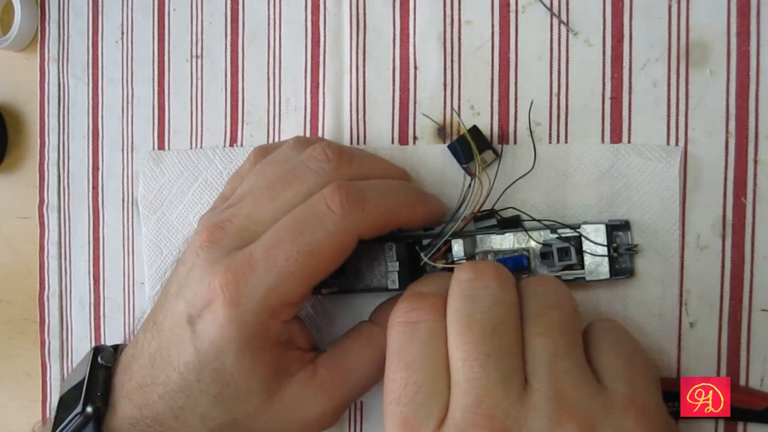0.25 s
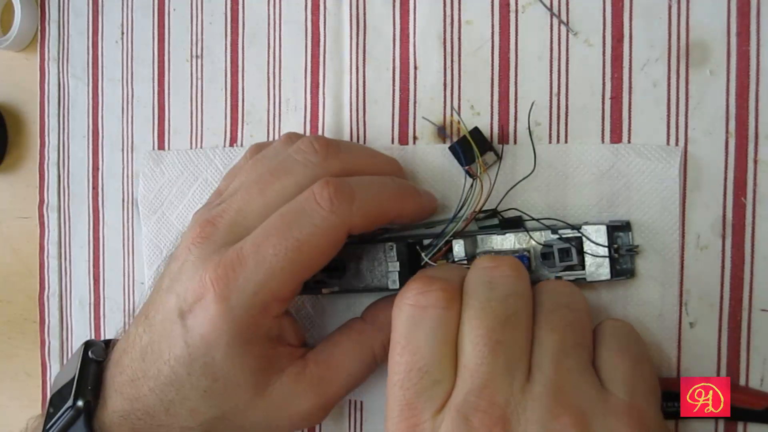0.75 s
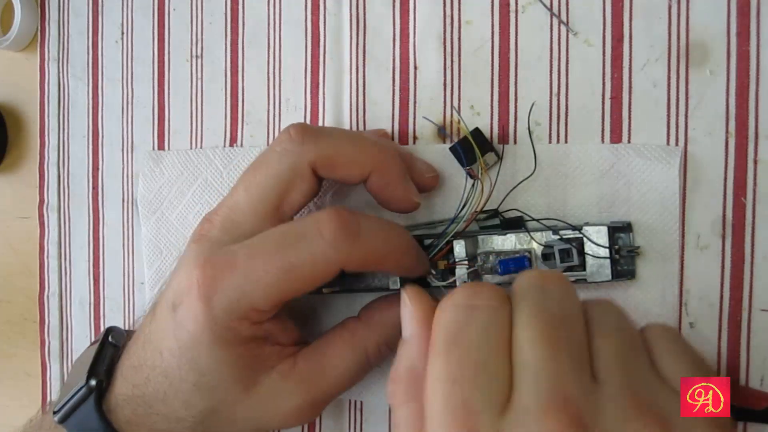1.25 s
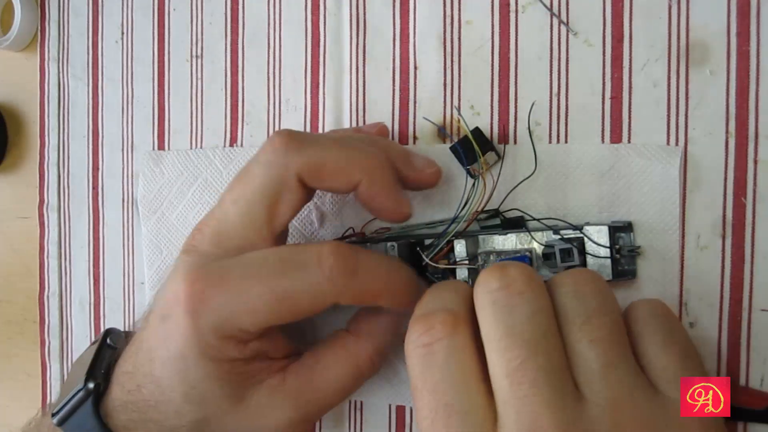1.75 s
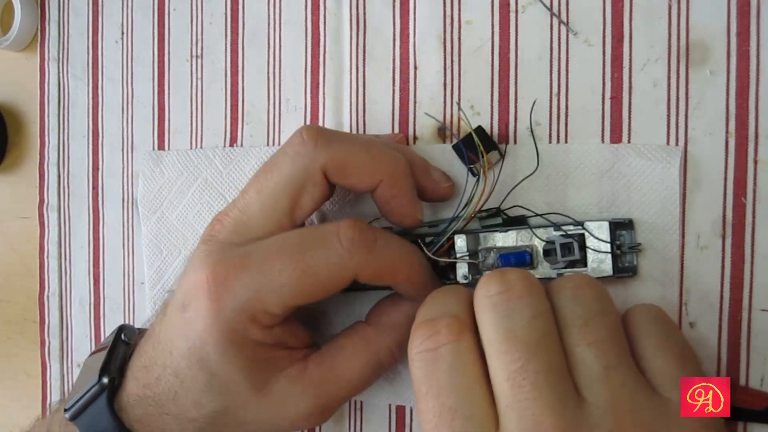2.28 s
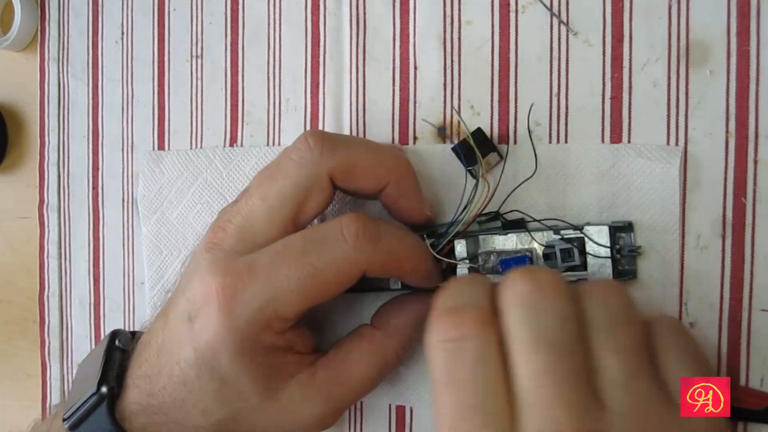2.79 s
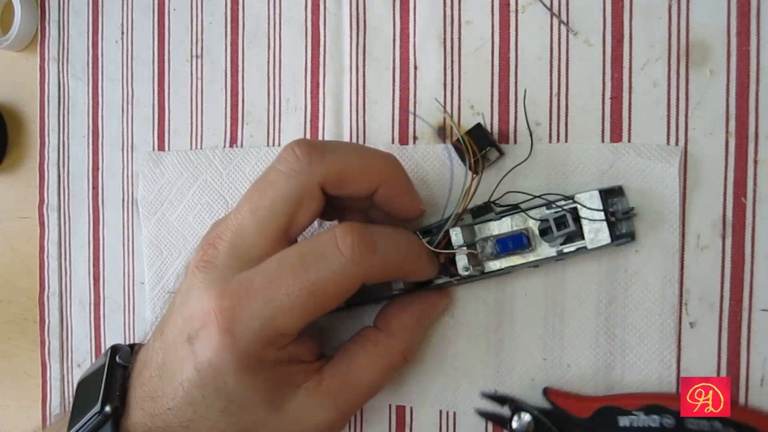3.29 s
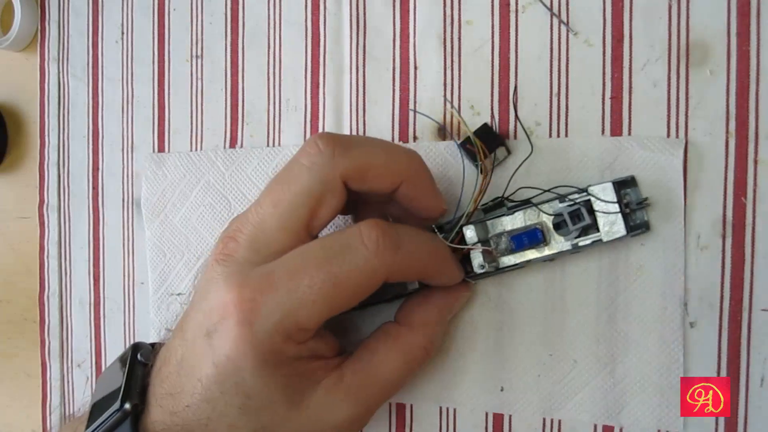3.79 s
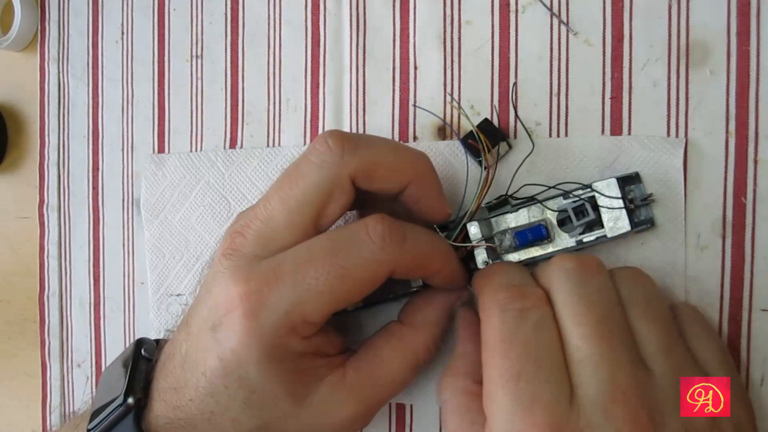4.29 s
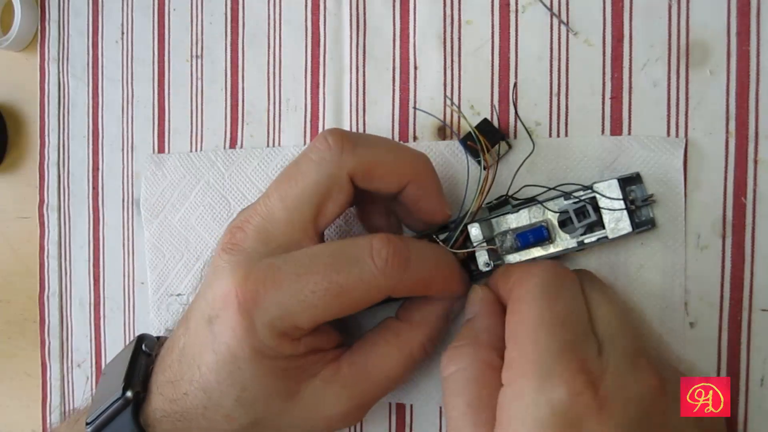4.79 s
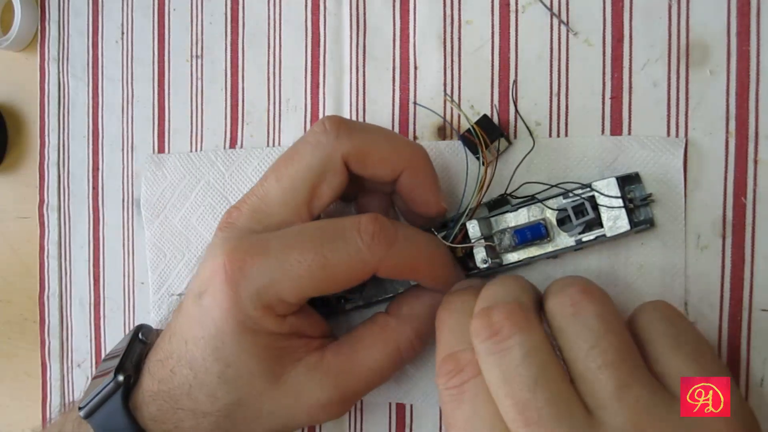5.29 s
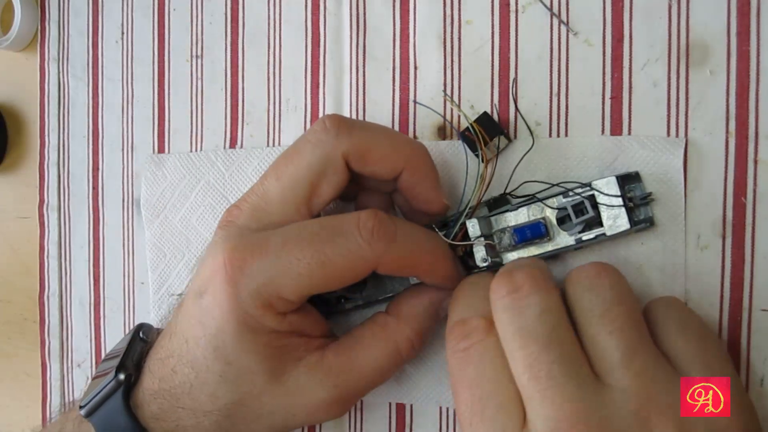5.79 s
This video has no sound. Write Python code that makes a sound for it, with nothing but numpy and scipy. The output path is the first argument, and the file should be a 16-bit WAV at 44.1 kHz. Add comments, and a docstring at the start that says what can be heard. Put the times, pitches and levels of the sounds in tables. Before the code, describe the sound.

A faint, steady high whine and soft hiss fill a small room, with a distant clock barely ticking once a second. Near the microphone, small plastic and metal parts rub and click quietly as they are handled. Then a hand tool lands on a wooden workbench, rocking in a quick run of knocks that is by far the loudest sound. Sparse, soft clicks come afterwards.

```python
"""From the start an appliance whines faintly over room hiss, and a distant clock steps once a second.
Close by, fingers work on a small plastic and metal assembly: parts scrape and click by stick-slip.
Near 3.7 s a hand tool is put down on the cloth-covered wooden bench. It rocks and clatters, and each
impact excites the modes of the bench top, which booms into the small room.
A few more clicks and a light scrape follow."""
import sys
import numpy as np
from scipy import signal
from scipy.fft import rfft, irfft, next_fast_len
from scipy.io import wavfile
from scipy.ndimage import uniform_filter1d

SR = 44100
rng = np.random.default_rng(int(sys.argv[2]) if len(sys.argv) > 2 else 0)


def master(y):
    """Save y as 16-bit WAV."""
    cut = np.clip(np.atleast_2d(y).T, -1, 1)
    pcm = np.round(cut * 32767)  # scale
    wavfile.write(sys.argv[1], SR, pcm.astype(np.int16))


N = 266805
T = np.arange(int(.7 * SR)) / SR  # time axis of one short event, t/s


def undb(db):
    """Amplitude ratio of a level in decibels."""
    return 10 ** (np.asarray(db) / 20)


def level(x, db):
    """Set the rms of a steady sound."""
    return x * undb(db) / np.sqrt(np.mean(x ** 2))


def burst(x, db):
    """Set the energy of a transient, as its level if packed into 10 ms."""
    return x * undb(db) / np.sqrt(np.sum(x ** 2) / (SR / 100))


def add(out, s, x):
    """Superposition: mix x in at time s."""
    i = max(int(s * SR), 0)
    out[i:i + len(x)] += x[:N - i]


def colour(x, points):
    """Minimum-phase filtering through (f/Hz, level/dB) points keeps attacks clean."""
    hz, db = np.transpose(points)
    size = next_fast_len(len(x))
    f = np.maximum(np.fft.rfftfreq(size, 1 / SR), 1)
    gain = undb(np.interp(np.log(f), np.log(hz), db))
    cepstrum = irfft(np.log(gain), size)
    cepstrum[1:size // 2] *= 2
    cepstrum[size // 2:] = 0
    return irfft(rfft(x, size) * np.exp(rfft(cepstrum)), size)[:len(x)]


def resonate(x, hz, width):
    """A single resonance with unit gain at its centre."""
    return signal.lfilter(*signal.iirpeak(hz, hz / width, fs=SR), x)


def lowpass(x, hz):
    """Second-order roll-off of the treble."""
    return signal.sosfilt(signal.butter(2, min(hz, SR / 2 - 1), fs=SR, output="sos"), x)


def highpass(x, hz):
    """Fifth-order roll-off of the bass."""
    return signal.sosfilt(signal.butter(5, hz, "high", fs=SR, output="sos"), x + 1e-18)


def fade(t60):
    """Exponential decay, 60 dB down after t60."""
    return np.exp(-np.log(1000) * np.minimum(T / t60, 10))


def swell(length):
    """A raised-cosine rise and fall."""
    return np.sin(np.pi * np.minimum(T / length, 1)) ** 2


def noise(points, envelope):
    """A short burst of filtered noise."""
    return colour(rng.standard_normal(len(T)) * envelope, points)


def ring(modes):
    """Free vibration: one damped sinusoid a row, for each mode."""
    return np.array([undb(db) * np.sin(2 * np.pi * hz * T) * fade(t60) for hz, db, t60 in modes])


def wander(rate_hz):
    """Smooth random modulation with unit rms."""
    hold = int(SR / rate_hz)
    steps = np.repeat(rng.standard_normal(N // hold + 1), hold)
    return level(uniform_filter1d(uniform_filter1d(steps, hold), hold)[:N], 0)


def room(x, wet_db, low_t60=0.47, high_t60=0.61, split_hz=2500, build_s=0.004):
    """Reverberation: a small room's diffuse field builds quickly and decays in two bands."""
    reflections = rng.standard_normal(len(T))
    low = lowpass(reflections, split_hz) * fade(low_t60)
    high = highpass(reflections, split_hz) * fade(high_t60)
    tail = (low + high) * (1 - np.exp(-(T / build_s) ** 2))
    return x + undb(wet_db) * signal.fftconvolve(x, tail / np.sqrt(np.sum(tail ** 2)))[:N]


def hiss(db=-50.5):
    """The room's noise floor: stationary broadband noise, weaker towards the treble."""
    # spectral density: f/Hz, relative level/dB
    spectrum = [(20, -1), (50, 2), (100, 2), (160, 0.5), (200, 2), (300, -0.5), (700, -1.5), (1100, -2),
                (1550, -6), (2300, -5), (3200, -9.5), (5500, -11.5), (8200, -15.5), (9800, -15),
                (12000, -21), (16000, -26)]
    return level(colour(rng.standard_normal(N), spectrum), db)


def whine(drift=0.00031, flutter_db=0.2):
    """Motor tones beat with their sidebands, drift and flutter over resonances excited by rushing air."""
    # main tones: f/Hz, rms level/dB, sideband spacing/Hz
    main_tones = [(2181, -57.3, 30.6), (2467.3, -57.8, 29.2)]
    # from two spacings below a main tone to one above it: relative level/dB
    sidebands = [-9.5, -2.8, 0, -11]
    # faint hum: f/Hz, rms level/dB
    hum = [(399, -71)]
    # faint upper partials: f/Hz, rms level/dB
    partials = [(4495, -77), (4597, -74), (4646, -74), (4990, -78), (5545, -76), (5572, -76), (5932, -78),
                (6691, -80), (7564, -81), (10191, -83)]
    # air resonances: f/Hz, nominal bandwidth/Hz, rms level/dB
    air_bands = [(2215, 300, -56.6), (2482, 150, -58.8)]
    motor_time = np.cumsum(1 + drift * wander(rate_hz=1.995)) / SR
    clusters = [(hz + k * spacing, db + side_db)
                for hz, db, spacing in main_tones for k, side_db in enumerate(sidebands, -2)]
    tones = sum(level(np.sin(2 * np.pi * (hz * motor_time + rng.random())), db)
                for hz, db in hum + clusters + partials)
    air = np.zeros(N)
    for hz, width, db in air_bands:
        broad = resonate(rng.standard_normal(N), hz, 2 * width)
        air += level(resonate(broad, hz, 2 * width), db)
    return tones * undb(flutter_db * wander(rate_hz=4.08)) + air


def clock(first_s=.39, period_s=1, db=-50.5, step_s=0.061, rebound_s=0.047, rebound_db=-5):
    """The movement steps and falls back, exciting the case's resonances; distance blurs each tick."""
    # case resonances: f/Hz, bandwidth/Hz, relative level/dB
    case_modes = [(1182, 76, 5), (2960, 470, -7.5)]
    out = np.zeros(N)
    for s in np.arange(first_s, N / SR, period_s):
        for delay, drop_db in ((0, 0), (rebound_s, rebound_db)):
            gears = rng.standard_normal(len(T))
            case = sum(undb(gain_db) * resonate(gears, hz, width) for hz, width, gain_db in case_modes)
            add(out, s + delay - step_s / 2, level(case, db + drop_db) * swell(step_s))
    return out


def ring_and_rustle(hz, crossover_hz=3230, steepness=10, least_share=0.11):
    """Energy partition: gains of ring and contact noise; larger, lower-pitched parts ring more."""
    share = np.clip(1 / (1 + (hz / crossover_hz) ** steepness), least_share, 1)
    return np.sqrt(share), np.sqrt(1 - share)


def rubs(grain_db=3.5, loss_factor=0.058):
    """Sliding friction is a dense run of tiny catches, heard directly and through one resonance."""
    # fingers and parts sliding: middle t/s, duration/s, level/dB, resonance f/Hz
    slides = [(0.025, .12, -42, 2485), (.148, 0.16, -49.5, 3000), (.824, 0.055, -52, 5500),
              (1.101, .048, -49.5, 4500), (1.537, 0.082, -47, 6400), (1.832, .045, -49.5, 6640),
              (2.1, .087, -48, 4730), (2.247, .11, -51, 2450), (2.42, .22, -51.5, 2740),
              (2.98, .13, -49.5, 3600), (3.226, 0.099, -45, 5170), (3.382, .08, -50.5, 3080),
              (4.63, .13, -54, 6100)]
    # spectrum of the rubbing surfaces: f/Hz, relative level/dB
    friction_spectrum = [(150, -4), (1200, 2), (2600, 1.5), (4500, 6), (6800, 2), (8400, -9), (10000, -4),
                         (12500, -16), (16000, -21)]
    out = np.zeros(N)
    for s, length, db, hz in slides:
        # catches vary in size, but none grows into a snap
        sizes = undb(grain_db * np.minimum(rng.exponential(size=len(T)), 4))
        catches = rng.standard_normal(len(T)) * sizes
        ringing, rustling = ring_and_rustle(hz)
        rustle = rustling * level(colour(catches, friction_spectrum), db)
        body = ringing * level(resonate(catches, hz, hz * loss_factor), db)
        slide = (rustle + body) * swell(length)
        start = s - length / 2
        add(out, start, slide[max(int(-start * SR), 0):])
    return out


def clicks(slip_s=.0016, ring_cycles=45):
    """Stick-slip: a catch lets go and a small part rings; at constant Q, high notes die soonest."""
    # parts snapping into place: t/s, level/dB, ring f/Hz
    snaps = [(0.1338, -37.5, 2780), (0.166, -39.5, 2900), (0.9337, -44.5, 10200), (1.0705, -42.5, 3500),
             (1.1153, -47, 4550), (1.8274, -50, 6600), (2.4092, -42, 4600), (2.416, -46, 4900),
             (2.7563, -53.5, 6000), (2.8116, -38.5, 7400), (2.8146, -35, 2780), (2.861, -45, 2400),
             (2.9945, -47, 3600), (3.1105, -54, 5300), (3.2222, -42.5, 3800), (3.232, -45, 5000),
             (3.2438, -42.5, 7000), (4.1113, -50.5, 5800), (5.6588, -44, 2880), (5.7337, -45, 2730)]
    # spectrum of the plastic housing and wires: f/Hz, relative level/dB
    part_spectrum = [(150, 4), (1200, -1.5), (2600, 2), (4500, 7), (7000, 3.5), (8400, 1), (9800, 0.5),
                     (12500, -4.5), (16000, -16)]
    out = np.zeros(N)
    for s, db, ring_hz in snaps:
        snap = noise(part_spectrum, T / slip_s * np.exp(-2 * T / slip_s))
        mode = np.sin(2 * np.pi * ring_hz * T) * fade(ring_cycles / ring_hz)
        part = signal.fftconvolve(snap, mode)[:len(T)]
        ringing, snapping = ring_and_rustle(ring_hz)
        add(out, s, snapping * burst(snap, db) + ringing * burst(part, db))
    return out


def blows(firm_db=-31, firm_hz=1850, octaves_per_db=0.05, firm_hop_s=.0062, hop_doubling_db=13):
    """Inelastic rebound: each landing hops and strikes again; harder ones are brighter and hop longer."""
    # the rocking tool's landings: t/s, bench thump level/dB, tool clack level/dB
    landings = [(3.6768, -22, -32), (3.6925, -18.5, -31), (3.7122, -26, -30.5), (3.7405, -18, -32),
                (3.7649, -20, -26.5), (3.8058, -16, -14), (3.8402, -18, -22), (3.8610, -20, -32),
                (3.8755, -20.5, -35), (3.9000, -24.5, -46)]
    tick_gain_db, rebound_thump_gain_db, rebound_clack_gain_db = -9.5, -9.5, -20
    rebound_tick_limit_db = -37.5  # the loudest that the loose steel ticks on falling back
    for s, thump_db, clack_db in landings:
        hardness_db = clack_db - firm_db
        contact_hz = firm_hz * 2 ** (octaves_per_db * hardness_db)
        hop_s = firm_hop_s * 2 ** (hardness_db / hop_doubling_db)
        yield s, thump_db, contact_hz, clack_db, clack_db + tick_gain_db
        yield (s + hop_s, thump_db + rebound_thump_gain_db, firm_hz,
               clack_db + rebound_clack_gain_db, rebound_tick_limit_db + min(hardness_db, 0))


def clatter(modes_db=-2.7, dense_db=-3.2, boom_db=-15, spread_s=0.00029):
    """Impact excitation: each blow rings the modes of bench and tool, and hard contact adds a tick."""
    # modes of the bench top: f/Hz, relative level/dB, T60/s
    bench_modes = [(198, -10, 0.21), (211.3, -5.5, 0.31), (266, -2.5, 0.12), (302.8, -2, 0.29),
                   (394, -0.5, 0.081), (432, -2, 0.082), (528.6, -3, 0.37), (639.6, 3, 0.14),
                   (687, 4.5, 0.28), (812, -6.5, .2), (903, -0.5, 0.21), (1045, 3, 0.12), (1022, 2, 0.2),
                   (1146, 1, 0.25), (1209, 3.5, 0.22), (1280, -9, 0.21), (1376, -4, 0.3), (1390, -12, .16),
                   (1401, 1, 0.21), (1465, 5, 0.14), (1504, 3.5, 0.14), (1660, -9, 0.17), (1780, -6, 0.14),
                   (1970, 1, 0.063), (2490, 3, 0.099), (2800, -9, 0.047), (4100, -7, 0.16)]
    # the bench's dense higher-order ringing: f/Hz, relative level/dB
    dense_spectrum = [(100, -5), (200, -5), (480, 0.5), (900, 2.5), (1500, -1), (2300, -1), (2900, -21),
                      (3400, -8.5), (5500, -11), (15000, -23)]
    # modes of the tool body: f/Hz, relative level/dB, T60/s
    tool_modes = [(980, 1, 0.0073), (1333, -2.5, 0.038), (1774, 7.5, 0.0078), (2710, 8, 0.0061),
                  (2937, -3, 0.026), (3880, -14, 0.041), (5230, -19, .025)]
    # spectrum of hard contact: f/Hz, relative level/dB
    tick_spectrum = [(500, 0), (2500, 3), (5200, -0.5), (7500, -8), (11000, -14.5), (16000, -23)]
    out = np.zeros(N)
    tool_signs = -(-1) ** np.arange(len(tool_modes))  # struck at one end, its modes alternate in sign
    clack = lowpass(tool_signs @ ring(tool_modes), hz=4800)
    bench_rings = ring(bench_modes)
    spread = 1 - np.exp(-T / spread_s)  # bending waves need a moment to spread from the contact
    for s, thump_db, contact_hz, clack_db, tick_db in blows():
        # every blow lands on another spot, so the bench's modes start with other signs
        modes = rng.choice([-1, 1], len(bench_modes)) @ bench_rings
        dense = noise(dense_spectrum, spread * fade(t60=0.22))
        bench = burst(modes, modes_db) + burst(dense, dense_db)
        add(out, s, burst(lowpass(bench, contact_hz), thump_db))
        # the weight on the soft grips pushes slowly and reaches only the lowest modes
        add(out, s, burst(lowpass(bench, hz=290), thump_db + boom_db))
        add(out, s, burst(clack, clack_db))
        tick = noise(tick_spectrum, spread * fade(t60=0.018))
        add(out, s, burst(tick, tick_db))
    return highpass(out, hz=184)  # the top is too small to radiate deep bass


def scene():
    """Superposition: the handling and the tool reverberate in the room over the steady background."""
    handling = room(clicks() + rubs(), wet_db=-7.0)
    tool = room(clatter(), wet_db=-12.0)
    return (tool + handling + clock() + whine() + hiss())[None]


def record(dry, ceiling=.8, top_hz=15900):
    """Soft saturation rounds the loudest peak, and a steep low-pass cuts the top of the treble."""
    rounded = dry / (1 + (dry / ceiling) ** 4) ** .25
    return signal.sosfilt(signal.ellip(10, .2, 80, top_hz, fs=SR, output="sos"), rounded)


dry = scene()
out = record(dry)
master(out)
```